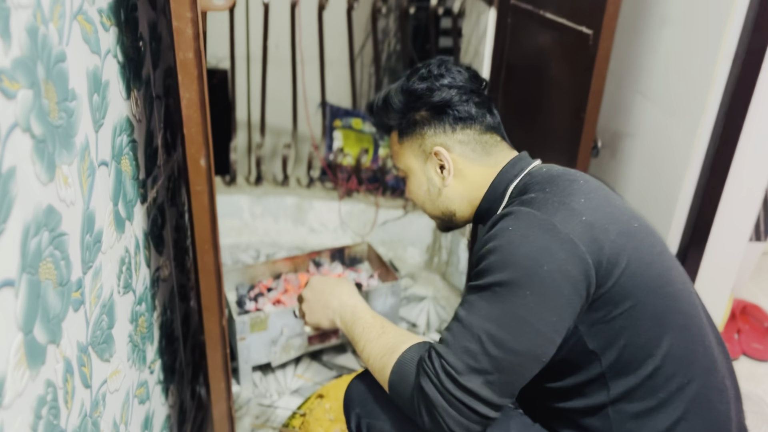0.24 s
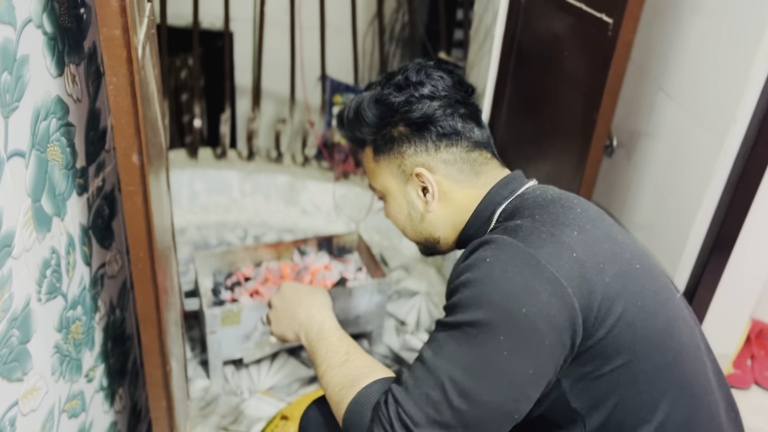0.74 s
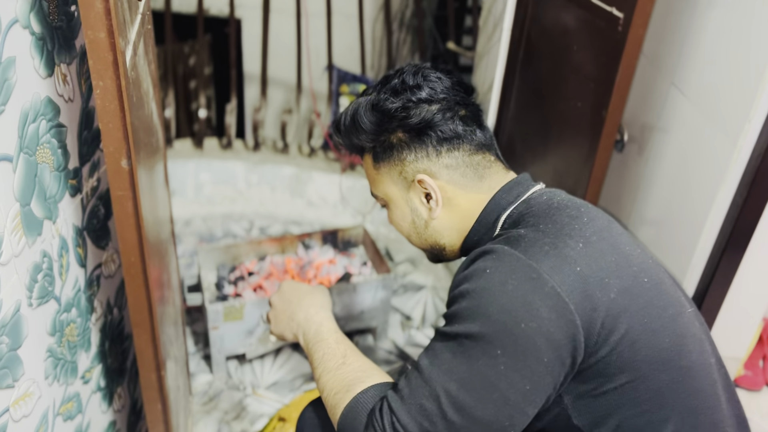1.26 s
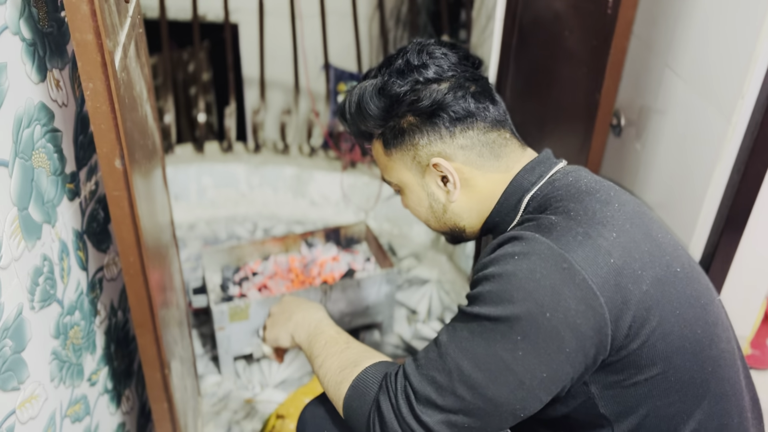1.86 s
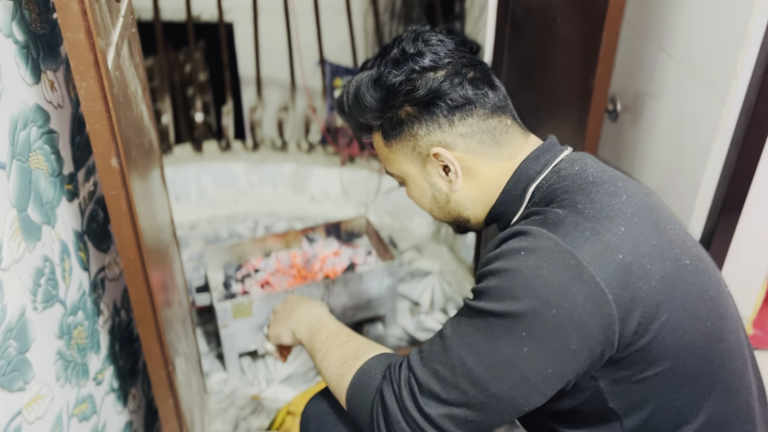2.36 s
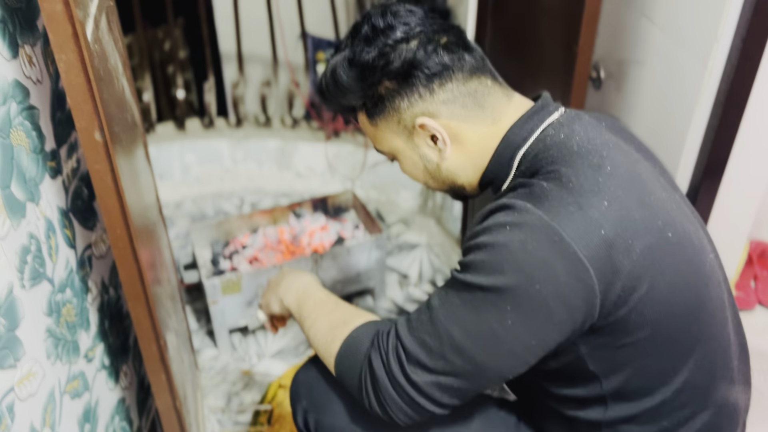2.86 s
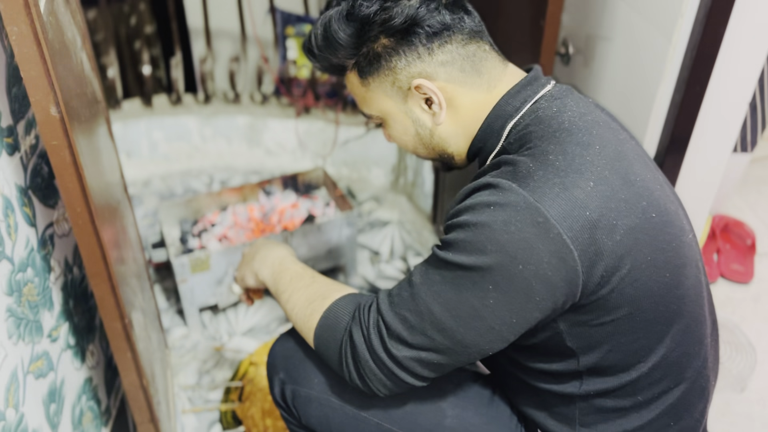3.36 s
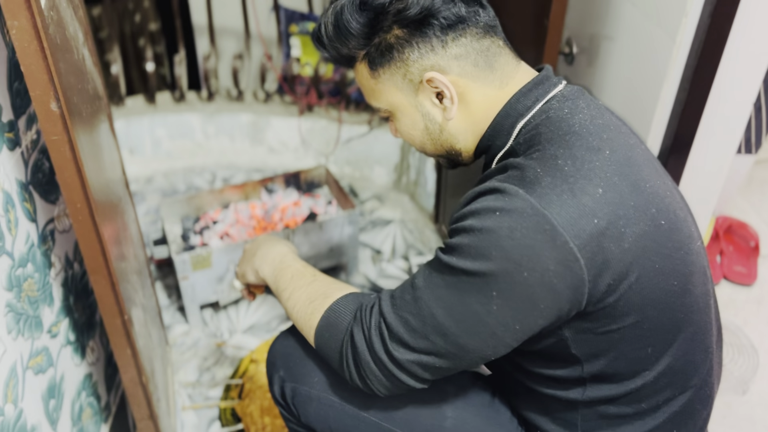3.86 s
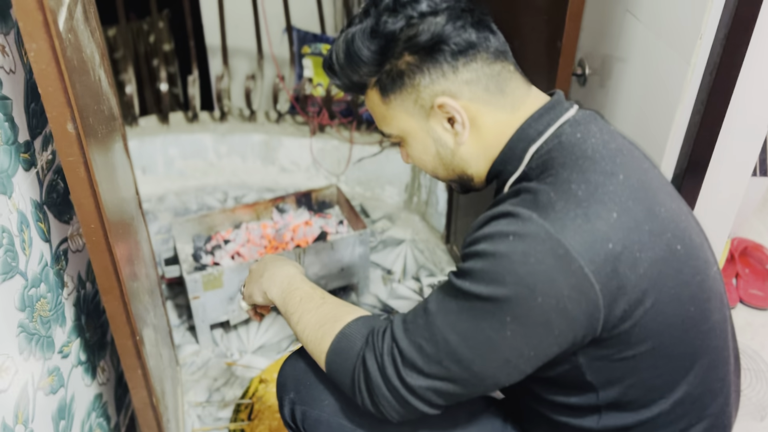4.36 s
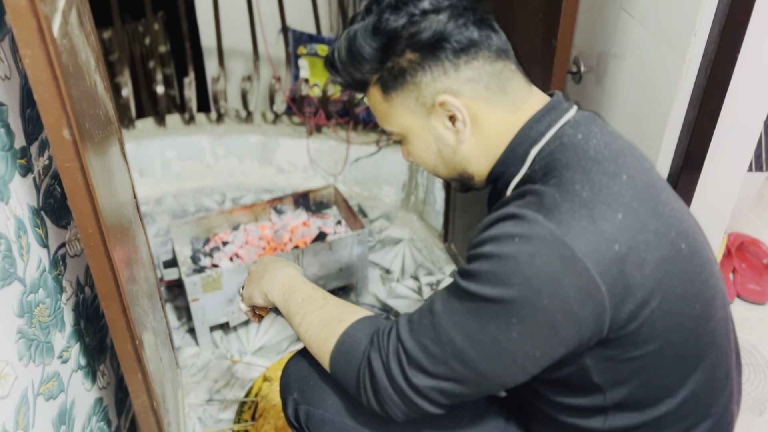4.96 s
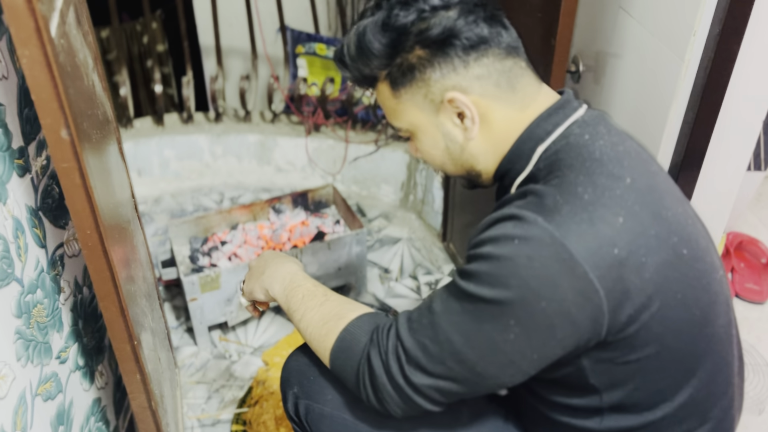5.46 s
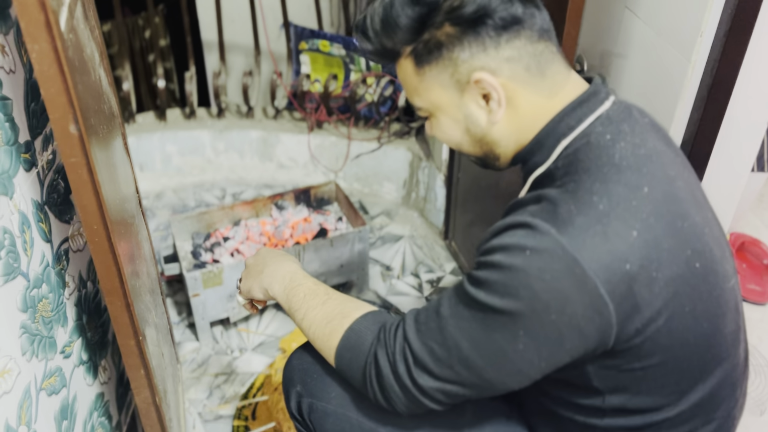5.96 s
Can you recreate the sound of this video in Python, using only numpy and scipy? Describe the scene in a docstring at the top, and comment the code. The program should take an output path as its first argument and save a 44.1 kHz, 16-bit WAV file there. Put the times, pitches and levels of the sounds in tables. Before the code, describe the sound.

Gritty scrapes and brittle clicks of hand-turned charcoal, two thin steel clinks, and finally a sharp metallic rattle as lumps spill in the tray.

```python
"""Throughout, distant machinery hums: a wavering low throb (sine) over a broad drone (shaped noise).
From the start, charcoal lumps turned by hand in a sheet-metal grill tray rub (gritty noise), click and
knock (noise bursts through resonances); midway, two of them clink on a steel rod (narrow modes).
Near the end a heap tumbles: blows and a rattle of random taps ring the tray modes.
The tray is on the floor of a small hard room; a handheld phone listens through two ports."""
import sys
import numpy as np
from scipy import signal
from scipy.fft import rfft, irfft, next_fast_len
from scipy.io import wavfile
from scipy.ndimage import uniform_filter1d, map_coordinates

SR = 44100
rng = np.random.default_rng(int(sys.argv[2]) if len(sys.argv) > 2 else 0)


def master(y):
    """Save y as 16-bit WAV."""
    cut = np.clip(np.atleast_2d(y).T, -1, 1)
    pcm = np.round(cut * 32767)  # scale
    wavfile.write(sys.argv[1], SR, pcm.astype(np.int16))


N = 274302


def amp(db):
    """Gain of a level in dB."""
    return 10 ** (np.asarray(db) / 20)


def unit(x):
    """x at rms 1."""
    return x / np.sqrt(np.mean(x ** 2) + 1e-20)


def along(points, f_hz):
    """(f/Hz, value) points interpolated on a log frequency axis."""
    knots_hz, values = np.transpose(points)
    return np.interp(np.log(f_hz + 1), np.log(knots_hz + 1), values)


def curve(rows):
    """(t/s, value) rows interpolated to one value per sample."""
    t_s, values = np.transpose(rows)
    return np.interp(np.arange(N) / SR, t_s, values)


def gate(rows):
    """1 while the table lasts, else 0."""
    t_s = np.arange(N) / SR
    return (t_s > rows[0][0]) & (t_s < rows[-1][0])


def wobble(rate_hz):
    """Smooth random curve with rate_hz knots a second."""
    knots = rng.standard_normal(int(N * rate_hz / SR) + 4)
    return map_coordinates(knots, [np.arange(N) * rate_hz / SR])


def filtered(x, response):
    """x times a complex response of frequency."""
    size = next_fast_len(x.shape[-1] + 8192)
    spectrum = rfft(x, size) * response(np.fft.rfftfreq(size, 1 / SR))
    return irfft(spectrum, size)[..., :x.shape[-1]]


def mode(f, f_hz, width_hz):
    """Causal resonance of gain 1 at its top."""
    return 1j * f * width_hz / (f_hz * f_hz - f * f + 1j * f * abs(width_hz))


def modes(f, rows):
    """Sum of (f/Hz, width/Hz, level/dB) modes of alternating sign."""
    return sum((-1) ** k * amp(db) * mode(f, f_hz, width_hz)
               for k, (f_hz, width_hz, db) in enumerate(rows))


def tilt(f, db_per_octave):
    """Slope about 3 kHz, flat below 300 Hz."""
    return amp(db_per_octave * np.log2(np.maximum(f, 300) / 3000))


# room decay: f/Hz, t60/s
ROOM_DECAY = [(150, 0.71), (1000, 0.5), (2800, 0.36), (7300, 0.24), (15000, 0.069)]


def echoed(x, wet_db):
    """x plus a fresh noise tail on each path; each frequency dies at its own speed."""
    noise = rng.standard_normal((2, SR * 2 // 3))
    f_hz, t_s, z = signal.stft(noise, SR, nperseg=256)
    decay = amp(-60 * t_s / along(ROOM_DECAY, f_hz)[:, None])
    tail = signal.istft(z * decay, SR, nperseg=256)[1]
    tail = np.pad(tail / np.linalg.norm(tail[0]), ((0, 0), (130, 0)))  # 2.9 ms to the first reflection
    wet = signal.fftconvolve(x, tail, axes=1)
    direct = np.pad(x, ((0, 0), (0, wet.shape[1] - x.shape[1])))
    return amp(wet_db) * wet + direct


def add(track, sound, t_s):
    """Lays a sound on the track from t_s."""
    part = track[:, round(t_s * SR):][:, :sound.shape[1]]
    part += sound[:, :part.shape[1]]


def burst(peak_db, t60_s, rise_s, response):
    """Contact noise on two paths that swells, dies and is coloured by what it shakes."""
    t_s = np.arange(SR // 5) / SR
    rise = 1 - np.exp(-t_s / max(rise_s, 1e-4))
    envelope = rise * amp(-60 * t_s / max(t60_s, .002))
    puff = filtered(rng.standard_normal((2, len(t_s))) * envelope, response)
    return amp(peak_db) * puff / np.abs(puff).max(axis=1, keepdims=True)


# low throb before wobble: t/s, rms level/dB
THROB_LEVEL = [(0.0, -64), (0.45, -54), (1.07, -64), (1.33, -52), (1.44, -60), (1.66, -47), (2.03, -57),
               (3.31, -61.5), (3.46, -49.5), (4.56, -56.5), (4.66, -44.5), (5.06, -45), (5.51, -62),
               (5.54, -51), (5.85, -43.5), (6.01, -56), (6.17, -44), (6.22, -57)]
# drone before wobble: t/s, rms level/dB
DRONE_LEVEL = [(0, -48.5), (1.2, -47), (2.5, -47.5), (3.5, -48.5), (4.4, -48.5), (5.1, -46), (5.8, -46),
               (6.22, -49.5)]
# drone spectrum: f/Hz, relative level/dB
DRONE_SPECTRUM = [(25, -38), (60, 2.5), (85, -10), (106, 4.5), (130, -6.5), (210, -1), (300, -12),
                  (400, -1), (520, -18), (900, -17.5), (1700, -24.5), (2600, -32.5), (6000, -40),
                  (10000, -51.5), (16000, -46.5)]


def hum():
    """Distant machinery: a sine wavering about 46 Hz over noise with a few soft humps."""
    throb_amp = np.sqrt(2) * amp(curve(THROB_LEVEL) + 2.2 * wobble(6))
    throb_hz = 46 + 3.5 * wobble(14)
    throb = throb_amp * np.sin(2 * np.pi * np.cumsum(throb_hz) / SR)
    noise = rng.standard_normal((2, N))
    drone = unit(filtered(noise, lambda f: amp(along(DRONE_SPECTRUM, f))))
    return throb + amp(curve(DRONE_LEVEL) + 1.93 * wobble(4.954)) * drone


# fingers and lumps sliding: full strength t/s, swell/s, hold/s, dry level/dB, lightness of touch 0-1
RUBS = [(0.0, .01, 0.027, -56, .75), (0.103, .09, 0.036, -50, 0.13), (.226, 0.37, .4, -56, 1),
        (0.796, 0.11, 0.043, -66, 0.8), (0.88, 0.043, .045, -46, 0.55), (1.246, .035, 0.045, -66, 0),
        (1.58, .03, .005, -71, 0), (1.832, .06, 0.077, -63, 0.4), (2.077, .07, 0.0045, -60.5, 0),
        (2.25, .01, .005, -63, .1), (3.136, .008, .005, -58.5, 1), (3.416, 0.17, 0.08, -68.5, .9),
        (3.543, .005, 0.018, -62.5, 0), (3.77, 0.13, 0.035, -60, 0), (3.86, .014, 0.06, -59, 0),
        (4.144, .04, .005, -56, 0.1), (4.2, .008, 0.11, -64.5, .5), (4.364, .05, .005, -55, 0),
        (4.811, .02, 0.12, -68, 0), (4.994, .1, .005, -64.5, .1), (5.256, .04, .04, -55, .6)]
# sliding noise before tilt: f/Hz, relative level/dB
GRIT_SPECTRUM = [(300, -35), (1000, -15), (2500, -1), (5000, 5.5), (9000, -1), (13000, -4), (16000, -26.5)]


def rubbing():
    """Porous faces slide: hiss broken by clumps of crumbling grit, brighter when the touch is light."""
    swell_db, fade_db_per_s = 24.5, 199.5  # climb over the swell; fall after the hold
    crumb_chance = 90 / SR * amp(5 * wobble(12))
    crumbs = (rng.random(N) < crumb_chance) * rng.exponential(size=N)
    grit = 1 + 0.99 * signal.lfilter([1], [1, -.985], crumbs)  # time constant 1.5 ms

    def hiss(db_per_octave):
        """Gritty noise of one brightness."""
        noise = grit * rng.standard_normal((2, N))
        return unit(filtered(noise, lambda f: amp(along(GRIT_SPECTRUM, f)) * tilt(f, db_per_octave)))

    dull, keen = hiss(-4.5), hiss(3.5)
    t_s, power = np.arange(N) / SR, np.zeros((2, N))
    for full_s, swell_s, hold_s, db, light in RUBS:
        before_db = np.maximum(swell_db * (full_s - t_s) / max(swell_s, .002), 0)
        after_db = fade_db_per_s * np.maximum(t_s - full_s - hold_s, 0)
        share = np.clip(light, 0, 1)
        power += np.outer([1 - share, share], amp(db - before_db - after_db) ** 2)
    rubs = np.sqrt(power[0]) * dull + np.sqrt(power[1]) * keen
    return echoed(rubs, wet_db=-2.5)[:, :N]


# lump against lump: t/s, dry peak level/dB, ring f/Hz, ring over crack/dB, brightness/(dB/octave)
CLICK_EVENTS = [(0.061, -43, 8070, 8, -2), (0.0946, -35.5, 2960, 20, -3.5), (0.1193, -40, 4840, 11, 2),
                (0.1694, -38.5, 5270, 5, -1), (1.3058, -42, 3780, 27, -12.5), (1.5803, -51.5, 2290, 0, -5),
                (1.7915, -36, 4450, 15, -8.5), (1.817, -35, 4550, 16, -7.5), (1.8676, -35, 3520, 20, -7.5),
                (1.882, -31, 4750, 12.5, -7.5), (2.0322, -44.5, 2290, 7, -5.5), (2.158, -48, 2280, 6, -7),
                (2.252, -34.5, 3400, 15.5, -8.5), (2.2615, -37.5, 3480, 16, -8.5),
                (2.3075, -40, 4740, 11, -9.5), (2.4538, -39.5, 2120, -16, -7), (3.1, -42.5, 8260, 2, -3.5),
                (3.1389, -38.5, 5270, 5, -1), (3.3293, -26, 10800, 14.5, -3.5),
                (3.5376, -31.5, 2900, 12, -4.5), (3.674, -39, 2120, 9, 1), (3.7196, -36.5, 2300, 10, -0.5),
                (3.7589, -34.5, 2280, 9, -4.5), (3.7744, -35, 3470, 21, -11), (3.8604, -32.5, 2200, 1, -2),
                (3.8803, -34, 4100, 6, -8), (4.0966, -41, 3590, 7, -3.5), (4.13, -30, 4730, 6, -3),
                (4.15, -24.5, 5000, -2.5, -3), (4.2004, -24.5, 4650, 17, -2),
                (4.332, -30.5, 4580, 10, -6.5), (4.455, -42, 2700, 13, -5.5), (4.5202, -41.5, 4530, 21, -8),
                (4.82, -43.5, 2340, 8, -9), (4.977, -38, 4300, 17.5, -9.5), (4.995, -37, 3100, 17, -9.5),
                (5.0308, -44.5, 2950, 18, -7.5), (5.3185, -7.5, 4570, 6, -9.5),
                (5.9456, -45.5, 2420, 7, 2.5)]


def clicks():
    """Each click cracks broadly and rings its own brittle lump; a small lump radiates no bass."""
    t60_s, t60_s_per_dull_db, rise_s = .032, .002, .001  # duller contacts last longer
    track = np.zeros((2, N))
    overtones = np.exp(rng.uniform(-0.42, 0.89, (len(CLICK_EVENTS), 4)))  # ratios, own set per lump
    for (t_s, peak_db, ring_hz, ring_db, bright), ratios in zip(CLICK_EVENTS, overtones):

        def lump(f):
            """Crack with overtones, plus the main ring."""
            partials = sum(mode(f, k * ring_hz, k * ring_hz / 18) for k in ratios)
            brittle = mode(f, 4200, 25000) ** 2 + amp(5.0) * partials
            ring = tilt(ring_hz, bright) * amp(ring_db) * mode(f, ring_hz, ring_hz / 8)
            return tilt(f, bright) * brittle + ring

        click = burst(peak_db, t60_s - t60_s_per_dull_db * bright, rise_s, lump)
        add(track, echoed(click, wet_db=-5.0), t_s)
    return track


# lump set down or bumped: t/s, dry peak level/dB, thud f/Hz, thud over crack/dB,
# contact hardness as top f/Hz, contact t60/s, room level/dB
KNOCK_EVENTS = [(.165, -35.5, 340, 37, 1000, 0.13, -7.5), (.851, -27, 1880, -18, 3730, 0.024, -3),
                (.862, -32, 388, 5, 1560, 0.054, -14), (1.0146, -16, 3350, 3.5, 4600, 0.033, -6),
                (1.017, -15, 660, -3, 2030, 0.098, -7.5), (1.306, -39, 1280, 33, 3000, 0.043, -4.5),
                (2.315, -37, 248, 13, 1400, 0.026, -7), (2.465, -30.5, 400, 16, 1210, 0.074, -10),
                (2.97, -33.5, 670, 2, 2000, 0.033, -31), (4.176, -31, 90, 18, 925, 0.026, -20),
                (4.29, -29.5, 710, -15, 1800, 0.019, -18), (5.196, -33, 1340, -5, 1770, 0.016, -9),
                (5.2, -33, 98, 17, 900, 0.036, -23), (5.305, -27, 200, 11, 900, .06, -6)]


def knocks():
    """A softer contact passes less treble; the tray floor answers with one broad thud."""
    rise_per_t60 = .065
    track = np.zeros((2, N))
    for t_s, peak_db, thud_hz, thud_db, top_hz, t60_s, room_db in KNOCK_EVENTS:

        def struck(f):
            """Treble-limited contact plus thud."""
            soft = mode(f, 820, 2100) / (1 + 1j * f / top_hz * 1.97 - (f / top_hz) ** 2) ** 2
            return soft + amp(thud_db) * mode(f, thud_hz, thud_hz / 2.5) ** 2

        knock = burst(peak_db, t60_s, rise_per_t60 * t60_s, struck)
        add(track, echoed(knock, room_db), t_s)
    return track


# lump meets the rod: t/s, dry peak level/dB
CLINK_EVENTS = [(3.3303, -24.5), (4.1505, -32)]
# steel grill rod modes: f/Hz, width/Hz, relative level/dB
ROD_MODES = [(1660, 49, -8), (3560, 170, -19), (5910, 200, -16.5), (7670, 130, -18), (8800, 200, -17),
             (11070, 170, 5.5), (12400, 250, -12), (13000, 250, -13), (14100, 250, -4.5)]


def clinks():
    """A very short contact leaves only the narrow modes of the steel."""
    track = np.zeros((2, N))
    for t_s, peak_db in CLINK_EVENTS:
        clink = burst(peak_db, 0.0095, 0.00045, lambda f: modes(f, ROD_MODES))
        add(track, echoed(clink, wet_db=-3.5), t_s)
    return track


# sheet-metal tray modes: f/Hz, width/Hz, relative level/dB
TRAY_MODES = [(380, 170, -5.5), (861, 24.6, 7), (1034, 39, -2), (1319, 18, 6), (1493, 84, -7.5),
              (1900, 33, -1.5), (2283, 30, -11), (3780, 120, -2), (4500, 32, -15.5), (4900, 130, -10.5)]
# tray between its modes, before an offset: f/Hz, relative level/dB
TRAY_SLAB = [(110, -68.5), (180, -12), (400, -7.5), (800, -1.5), (1800, -3), (3200, -1.5), (6000, -17.5),
             (10000, -38.5), (16000, -73)]


def tray(f):
    """Sheet-metal modes on a broad slab response."""
    return amp(along(TRAY_SLAB, f) - 5.5) + modes(f, TRAY_MODES)


# lumps strike the tray wall: t/s, dry peak level/dB, nearest panel f/Hz, crack over ring/dB
BLOW_EVENTS = [(5.256, -23.5, 600, -8), (5.298, -4.5, 2038, -12.5), (5.309, -3.5, 2270, -3),
               (5.318, -3, 1485, -7.5), (5.331, -14, 930, -13.5), (5.337, -18.5, 970, -11),
               (5.343, -13.5, 876, -17.5), (5.349, -19.5, 1030, -13.5), (5.392, -10, 2000, -9),
               (5.416, -11.5, 1420, -7), (5.464, -9.5, 1920, 1.5), (5.473, -6.5, 2010, -14),
               (5.484, -7.5, 2190, -9), (5.531, -6.5, 2250, -7), (5.538, -10, 1416, -10),
               (5.55, -9, 1300, -12.5), (5.577, -12, 2084, -9.5)]


def heap_hz():
    """The heap rattles on the panel struck last, then settles mid-tray."""
    start_hz, rest_hz, settle_s, shift_s = 880, 1610, .05, .01
    blow_s = [row[0] for row in BLOW_EVENTS]
    panels_hz = [start_hz] + [row[2] for row in BLOW_EVENTS] + [rest_hz]
    latest = np.searchsorted(blow_s + [blow_s[-1] + settle_s], np.arange(N) / SR)
    return uniform_filter1d(np.array(panels_hz, float)[latest], max(round(shift_s * SR), 1))


# heap rolling, drive before the tray: t/s, relative level/dB
TUMBLE_LEVEL = [(5.17, -67), (5.2, -49.5), (5.288, -31.5), (5.302, -24), (5.39, -25), (5.46, -30.5),
                (5.476, -13.5), (5.502, -24.5), (5.556, -19.5), (5.676, -41.5), (5.82, -47), (6.0, -69)]
# tray regions that take turns: f/Hz, width/Hz, relative level/dB
TRAY_PANELS = [(850, 240, 3), (1503, 880, 1.5), (2103, 980, -4)]


def tumble():
    """Hard blows on the tray over a scrape and rattle of small lumps that wanders between panels."""
    track = np.zeros((2, N))
    for t_s, peak_db, panel_hz, crack_db in BLOW_EVENTS:

        def shaken(f):
            """Bright crack of the whole tray plus ring of the panel."""
            return amp(crack_db) * tray(f) * tilt(f, 1.7) + mode(f, panel_hz, 280) ** 2

        add(track, echoed(burst(peak_db, 0.02, 0.00083, shaken), wet_db=-7.5), t_s)

    hits = (rng.random(N) < 350 / SR) * amp(2.74 * rng.exponential(size=N))  # about 350 a second
    taps = unit((.15 + hits) * rng.standard_normal((2, N)))  # .15: steady scrape
    driven = taps * amp(curve(TUMBLE_LEVEL)) * gate(TUMBLE_LEVEL)
    rattle = amp(8.5) * filtered(driven, tray)
    place_hz = heap_hz()
    for f_hz, width_hz, db in TRAY_PANELS:
        near = np.exp(-(np.log(place_hz / f_hz) / .24) ** 2)
        panel = lambda f: tray(f) * mode(f, f_hz, width_hz) ** 2
        strength = amp(db) / np.std(filtered(taps, panel))
        rattle = rattle + strength * filtered(driven * near, panel)
    return track + echoed(rattle, wet_db=-4.0)[:, :N]


def scene():
    """Two paths of the same scene; their noise is independent."""
    return hum() + rubbing() + clicks() + knocks() + clinks() + tumble()


# likeness of the ports: f/Hz, correlation 0-1
PORT_LIKENESS = [(40, 1), (300, 1), (700, 0.84), (1100, 0.47), (1450, 0.54), (2000, 0.43), (2800, 0.8),
                 (4600, 0.48), (6000, 1), (15000, 1)]
# left port leads: f/Hz, phase/rad
LEFT_LEAD = [(0, 0), (1100, -3), (1500, -1.7), (1800, 0), (2700, 2.9), (4900, 1.2), (6000, 3.2),
             (14600, 15.7), (16500, 18.4)]
# left over right: f/Hz, level/dB
LEFT_FAVOUR = [(300, 0), (850, -2.5), (1500, 0.5), (3000, -0.8), (4600, -3.5), (5800, 0)]
# microphone treble: f/Hz, gain/dB
MIC_RESPONSE = [(14000, 0), (15500, -5), (15900, -16), (16500, -30)]


def record(dry):
    """Ports share the paths in part; the phone body shifts phase; peaks round off; treble is cut."""
    top_hz, ceiling = 16500, .93

    def mix(f):
        """Gains of the shared and opposed paths."""
        turn = np.arccos(np.clip(along(PORT_LIKENESS, f), -1, 1)) / 2
        return np.array([np.cos(turn), np.sin(turn)])

    def sides(f):
        """Half the level and phase difference to each port."""
        phase_rad = np.interp(f, *np.transpose(LEFT_LEAD))
        half = amp(along(LEFT_FAVOUR, f) / 2) * np.exp(1j * phase_rad / 2)
        return np.array([half, 1 / half])

    shared, apart = filtered(dry, mix)
    ports = filtered(np.array([shared + apart, shared - apart]), sides)
    ports = ports / (1 + np.abs(ports / ceiling) ** 6) ** (1 / 6)  # input stage
    return filtered(ports, lambda f: amp(along(MIC_RESPONSE, f)) * (f < top_hz))


dry = scene()
out = record(dry)
master(out)
```